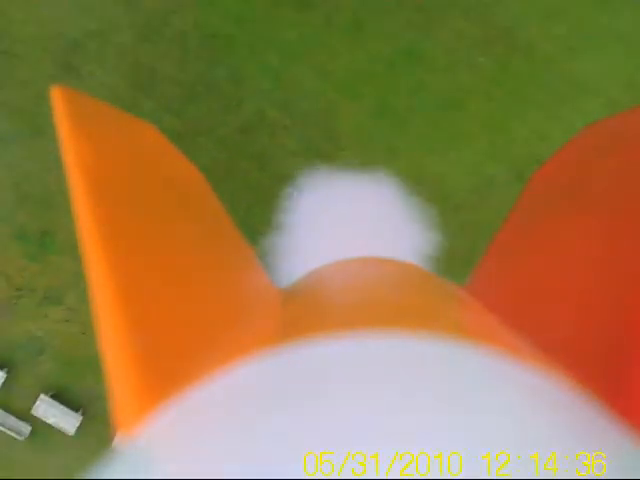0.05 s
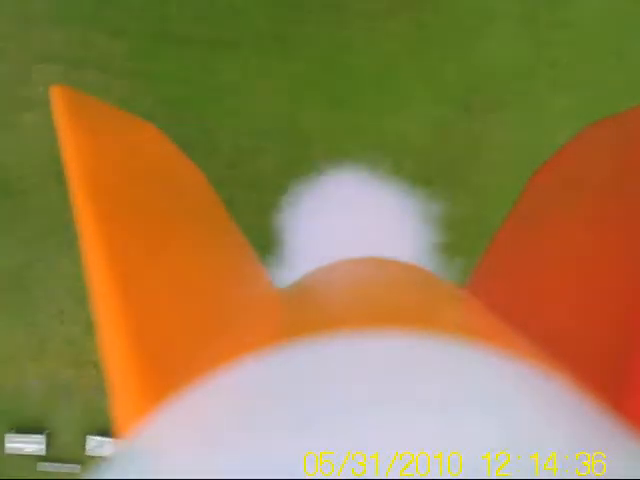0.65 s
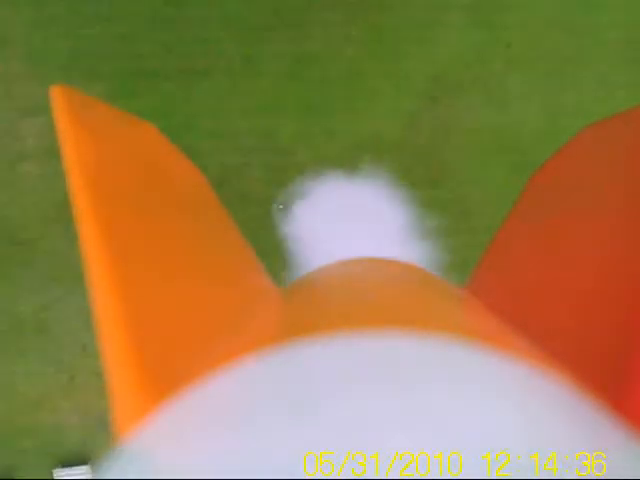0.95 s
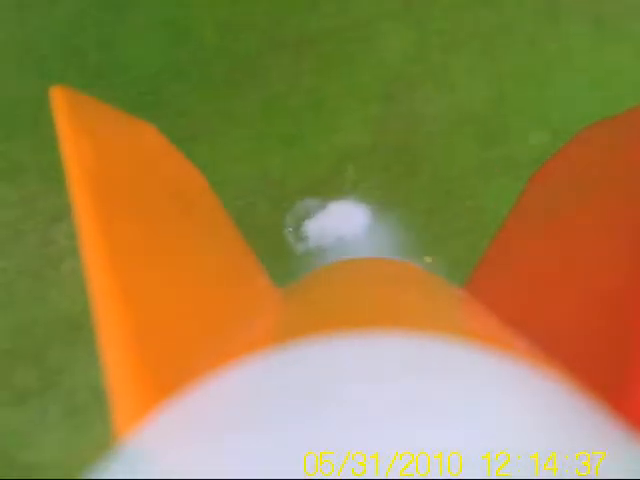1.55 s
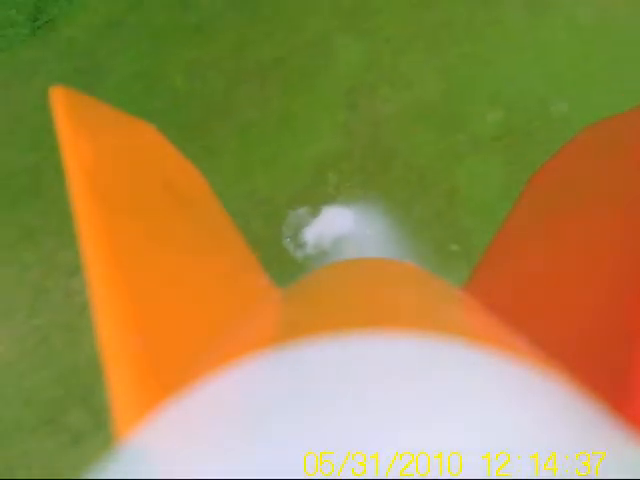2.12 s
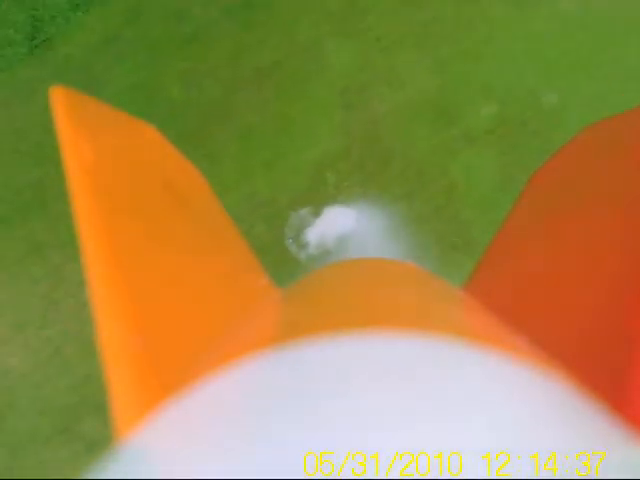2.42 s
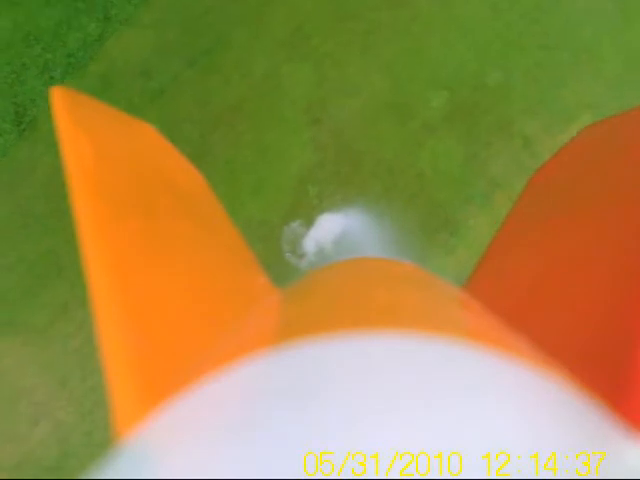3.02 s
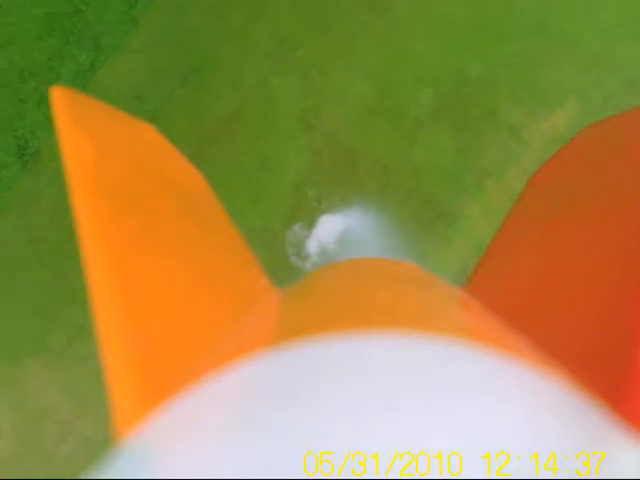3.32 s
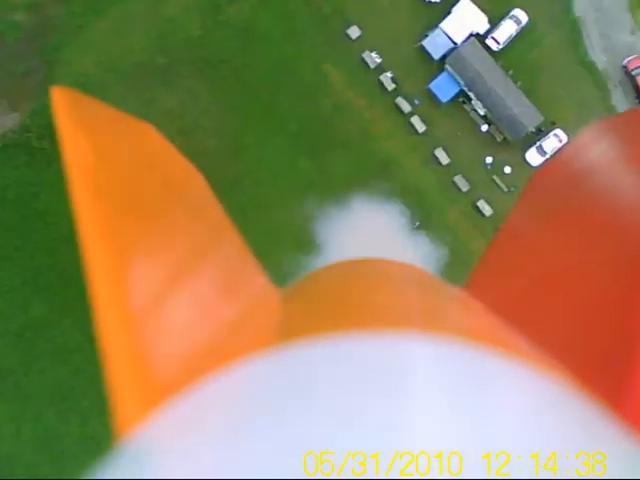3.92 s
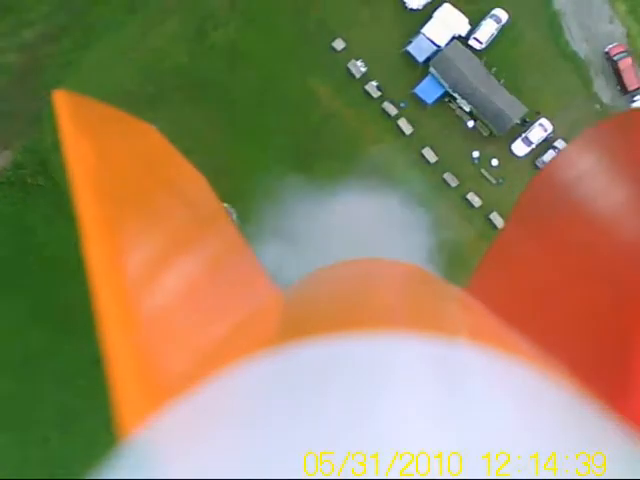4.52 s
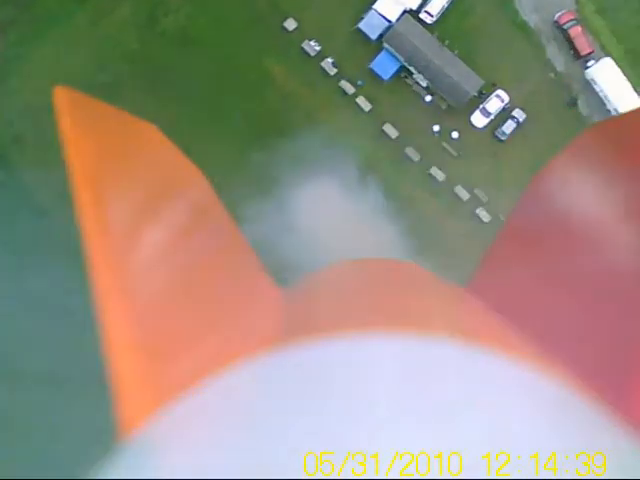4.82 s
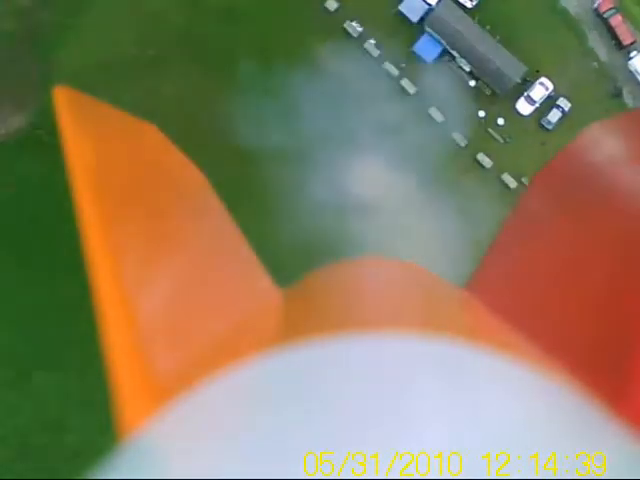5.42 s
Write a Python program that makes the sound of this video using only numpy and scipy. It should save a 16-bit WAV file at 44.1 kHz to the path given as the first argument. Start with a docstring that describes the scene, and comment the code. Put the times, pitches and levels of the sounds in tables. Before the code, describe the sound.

A model rocket's motor roars and fades, cuts to soft wind, then a hard distorted bang and rattle, heard from on board.

```python
"""Riding a model rocket

A small camera rides on the airframe. The motor roars until an abrupt cut to the softer wind of the coast.
The ejection charge bursts the cardboard tube open with a hard, overloaded knock; the parts rattle,
then drift down in light air with small taps. The camera's coarse, stepped sampling adds a gritty sizzle."""
import sys
import numpy as np
from scipy.fft import rfft, irfft, next_fast_len
from scipy.io import wavfile
from scipy.ndimage import uniform_filter1d, map_coordinates

SR = 44100
rng = np.random.default_rng(int(sys.argv[2]) if len(sys.argv) > 2 else 0)


def bounce(signal):
    """Save signal as a 16-bit WAV file at the path given by the first command-line argument."""
    frames = np.transpose(np.atleast_2d(signal))
    limited = np.clip(frames, -1, 1)
    pcm = np.round(limited * 32767).astype(np.int16)
    wavfile.write(sys.argv[1], SR, pcm)


N = 245195
CUT_TO_COAST_S, OPEN_S = 3.965, 4.3
# Dry, bright colour of the ejection crack and the taps: freq_hz, relative_db
CRACK_SPECTRUM = [(100, -23.5), (500, 2.5), (850, 3.5), (1250, -2.5), (1480, 4.5), (1850, -8.5),
                  (2150, -10), (2700, -21)]


def motor(lopsided=0.038, flutter_db=0.63, waver_db=0.36, buffet_db=-3.5, swell_db=1.9, chuff_trim_db=-2):
    """Turbulent exhaust roars and chuffs, air buffets the microphone; an edit cuts it with a click."""
    # Roar through the airframe, humped at its resonances: freq_hz, relative_db
    exhaust_spectrum = [(50, -21.5), (110, -2), (220, 0.5), (320, -2), (420, -3), (510, -10.5),
                        (620, -17.5), (730, -19), (860, -14), (1000, -18.5), (1340, -26), (1550, -24),
                        (1760, -29.5), (2340, -37.5), (2750, -51.5)]
    # Rumble of air on the microphone: freq_hz, relative_db
    buffet_spectrum = [(5, -11.5), (15, 1.5), (28, -1.5), (50, -8), (110, -10), (170, -24.5), (400, -90)]
    # Strongest thumps in the roar: time_s, peak_db (before the trim)
    chuffs = [(.078, -6), (1.174, 1.5), (1.187, -8), (1.361, -6), (2.958, -4.5), (3.539, -4)]
    jet = even(noise(exhaust_spectrum), seconds=0.16)
    jet *= amp(flutter_db * wobble(60) + waver_db * wobble(9))
    jet = unit(jet - lopsided * (jet ** 2 - 1))  # troughs are sharper than crests
    buffet = amp(buffet_db + swell_db * wobble(6)) * even(noise(buffet_spectrum), seconds=0.132)
    roar = amp(roar_level(clock())) * (jet + buffet)
    # weaker thumps fall at random and follow the roar's level
    thumps = [(s, roar_level(s) + 4 + 2.5 * size) for s, size in scattered(0, CUT_TO_COAST_S, count=8)]
    chuffing = amp(chuff_trim_db) * pulses(list(chuffs) + thumps, width_s=.001)
    cut_click = pulses([(CUT_TO_COAST_S, -21)], width_s=.001)
    return (roar - chuffing - cut_click) * (clock() < CUT_TO_COAST_S)


def roar_level(t, hold_db=-16.5, surge_db=2.3, surge_at_s=.7, fade_from_s=1.44, fade_db_per_s=3):
    """The exhaust's level in dB: a hold with one broad surge, then a long even fade."""
    surge = surge_db * np.exp(-((t - surge_at_s) / .17) ** 2)
    return hold_db + surge - fade_db_per_s * np.maximum(t - fade_from_s, 0)


def ejection(push=.44, linger=.09, leak_s=.06, crack_trim_db=0.5):
    """Gas booms and cracks through the tube and presses on the microphone; the pressure leaks away."""
    # Hollow boom of the tube: freq_hz, relative_db
    boom_spectrum = [(30, -18.5), (150, -16), (280, -14), (390, 4), (520, -0.5), (660, -15.5), (830, -13),
                     (1500, -34.5), (2700, -56)]
    # Surges of gas: start_s, level_db, length_s, bright_db (crack over boom, before the trim)
    surges = [(4.243, -26, .018, -4.5), (4.2600, -18, .009, -6), (4.2683, -8.5, 0.0062, -13),
              (4.273, -15, 0.012, -9.5), (4.2850, -8, 0.0083, 5), (4.29, -17, 0.039, -3),
              (4.324, -13.5, 0.015, -4.5), (4.3390, -15, 0.008, -9)]
    # Sharp pressure blows: time_s, peak_db
    slams = [(4.2975, 6.5), (4.3003, 9.5), (4.3240, 2.5)]
    boom = even(noise(boom_spectrum), seconds=0.01)
    crack = even(noise(CRACK_SPECTRUM), seconds=0.0035)
    blast = np.zeros(N)
    for s, db, length, bright_db in surges:
        gate = between(s, s + length, edge_s=.0007)
        blast += amp(db) * gate * (boom + amp(bright_db + crack_trim_db) * crack)
    push_s, release_s = 4.294, 4.342
    leak = np.exp(-np.maximum(clock() - release_s, 0) / leak_s) * between(release_s, 10, edge_s=.005)
    pressure = push * between(push_s, release_s, edge_s=.005) + linger * leak
    return blast - pressure - pulses(slams, width_s=.0003)


def rattle(chatter_db=-33.5, fade_db_per_s=105, grain_db=3, tap_t60_s=0.052, tap_trim_db=-8, dry_db=-4):
    """Loose parts chatter against the tube, dying away into single taps and light random touches."""
    # Parts scraping on the tube: freq_hz, relative_db
    clatter_spectrum = [(59, -41.5), (100, -12), (158, -21), (199, -8.5), (450, 1), (699, -12.5),
                        (1060, -5.5), (1210, -21.5), (1490, -11.5), (1890, -20), (2700, -31), (3510, -65),
                        (5940, -120)]
    # Clearest taps of the cord and nose cone: start_s, relative_db
    taps = [(4.364, -22.5), (4.394, -26), (4.516, -42), (4.763, -42), (4.808, -44), (4.853, -47),
            (4.967, -47.5), (5.01, -49), (5.091, -47), (5.255, -49), (5.428, -43.5)]
    t = clock()
    chatter = unit(noise(clatter_spectrum) * amp(grain_db * wobble(250)))
    chatter *= amp(chatter_db - fade_db_per_s * np.maximum(t - 4.35, 0)) * between(4.34, 10, edge_s=.003)
    touches = [(s, -54 + 2.5 * size) for s, size in scattered(OPEN_S, N / SR, count=14)]
    tap_envelope = sum(amp(db + tap_trim_db - 60 * np.clip(t - s, 0, 1) / tap_t60_s) * (t >= s)
                       for s, db in list(taps) + touches)
    hollow_ring = unit(tube(rng.standard_normal(N)))
    dry_contact = amp(dry_db) * noise(CRACK_SPECTRUM)
    return chatter + tap_envelope * even(hollow_ring + dry_contact, seconds=.01)


def tube(x):
    """The cardboard airframe rings in a few broad resonances of alternating polarity."""
    # Airframe resonances: pitch_hz, width_hz, gain_db
    modes = [(420, 100, 1.5), (937, 67, -0.5), (1500, 140, -15.5), (1980, 37, -16)]
    return filtered(x, lambda f: sum(
        (-1) ** k * amp(db) * 1j * f * width / (hz * hz - f * f + 1j * f * width)
        for k, (hz, width, db) in enumerate(modes)))


def airflow(coast_db=-30.5, breeze_db=-47, rush_db=14, settle_s=0.093, tumble_db=6, flutter_db=1.6):
    """Fast smooth wind while coasting; a light, uneven breeze and low gusts once the rocket opens."""
    # Fast air along the tube: freq_hz, relative_db
    coast_spectrum = [(12, -28), (20, -2), (76, 0.5), (108, -5.5), (156, -4), (271, -10), (409, -8),
                      (462, -9), (655, -32.5), (855, -25), (948, -32.5), (1290, -37.5), (1580, -36),
                      (1940, -49), (2700, -61), (3510, -92), (5940, -120)]
    # Slow air on the way down: freq_hz, relative_db
    drift_spectrum = [(12, -13.5), (24, 2.5), (70, -3), (135, -12), (212, -9.5), (280, -17.5), (420, -15),
                      (560, -25), (740, -36.5), (980, -32), (1250, -42), (1500, -38), (2000, -44.5),
                      (2700, -47.5)]
    # Low gusts on the swinging tube: freq_hz, relative_db
    sway_spectrum = [(8, -17.5), (22, 2.5), (36, -10), (80, -26), (200, -58.5)]
    # Swings of the tube through the air: start_s, level_db, length_s
    gusts = [(4.526, -29.5, 0.1), (4.65, -37.5, 0.071)]
    t = clock()
    coast = amp(coast_db) * noise(coast_spectrum) * between(CUT_TO_COAST_S, OPEN_S, edge_s=.002)
    slowing = rush_db * np.exp(-np.maximum(t - OPEN_S, 0) / settle_s)  # the opened rocket loses speed
    tumble = tumble_db * np.exp(-((t - 4.815) / .025) ** 2)  # one swell as it tumbles
    drift_db = breeze_db + slowing + tumble + flutter_db * wobble(30)
    drift = amp(drift_db) * noise(drift_spectrum) * between(OPEN_S, 10, edge_s=.01)
    swing = sum(amp(db) * between(s, s + length, edge_s=0.013) for s, db, length in gusts)
    return coast + drift + swing * even(noise(sway_spectrum), seconds=0.086)


def electronics(hiss_db=-78, whine_trim_db=1):
    """The camera's own faint whine and hiss."""
    # Tones of the whine: pitch_hz, level_db (before the trim)
    tones = [(1400, -84), (1852, -83.5), (2401, -84)]
    whine = sum(amp(db + whine_trim_db) * np.sin(2 * np.pi * hz * clock() + .8 * wobble(20))
                for hz, db in tones)
    return whine + amp(hiss_db) * rng.standard_normal(N)


def amp(db):
    """Decibels to gain."""
    return 10 ** (np.asarray(db) / 20)


def unit(x):
    """Scale to rms 1."""
    return x / np.sqrt(np.mean(x ** 2) + 1e-20)


def even(x, seconds):
    """Hold the short-term rms of x at 1."""
    power = uniform_filter1d(x ** 2, max(int(seconds * SR), 2))
    return x / np.sqrt(np.abs(power) + 1e-3)


def clock():
    """The time of every sample in seconds."""
    return np.arange(N) / SR


def wobble(rate):
    """A smooth random curve, rate knots a second."""
    knots = rng.standard_normal(int(N * rate / SR) + 4)
    return map_coordinates(knots, [np.arange(N) * rate / SR])


def filtered(x, response):
    """Shape x with a complex frequency response."""
    size = next_fast_len(N + SR // 2)
    return irfft(rfft(x, size) * response(np.fft.rfftfreq(size, 1 / SR)), size)[:N]


def noise(spectrum):
    """Noise of rms 1 coloured by (freq_hz, relative_db) points."""
    f, db = np.transpose(spectrum)
    colour = lambda hz: amp(np.interp(np.log(hz + 1), np.log(f + 1), db, right=-120))
    return unit(filtered(rng.standard_normal(N), colour))


def between(start_s, end_s, edge_s):
    """A gate that opens and shuts with soft edges."""
    t = clock()
    return (np.tanh((t - start_s) / edge_s) - np.tanh((t - end_s) / edge_s)) / 2


def pulses(rows, width_s):
    """One-sided pressure pulses, a short bell curve for each (time_s, peak_db)."""
    return sum(amp(db) * np.exp(-np.minimum(((clock() - s) / width_s) ** 2, 20)) for s, db in rows)


def scattered(start_s, end_s, count):
    """Random events (time_s, size), one per equal share of the span; sizes have mean 0 and spread 1."""
    place, size = rng.random((count, 2)).T
    times = start_s + (end_s - start_s) * (np.arange(count) + place) / count
    return np.column_stack([times, (2 * size - 1) * np.sqrt(3)])


def scene():
    """Everything reaches the one microphone on the airframe directly."""
    return (motor() + airflow() + ejection() + rattle() + electronics())[None]


def record(dry, rail=.93, overflow=1.35, hold_samples=8, top_hz=15800):
    """The converter flattens peaks, flips to the top rail when far below range, and holds each value."""
    overloaded = np.where(dry[0] < -overflow, rail, np.clip(dry[0], -rail, rail))
    # the steps mirror the low sound into the treble as sizzle
    steps = np.repeat(overloaded[::hold_samples], hold_samples)[:N]
    return filtered(steps, lambda hz: hz < top_hz)[None]


dry = scene()
out = record(dry)
bounce(out)
```